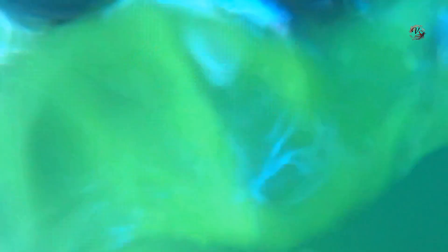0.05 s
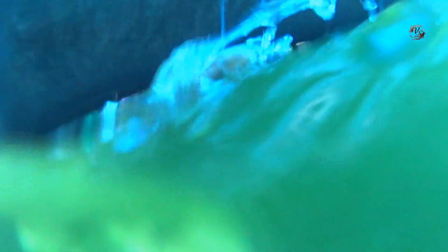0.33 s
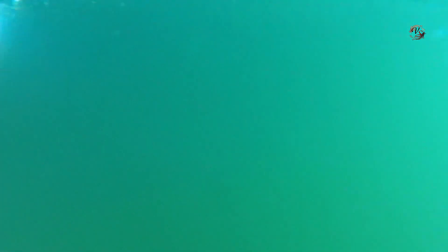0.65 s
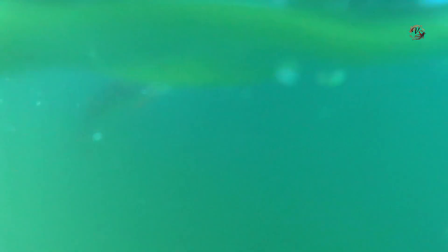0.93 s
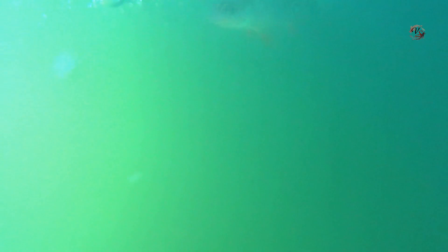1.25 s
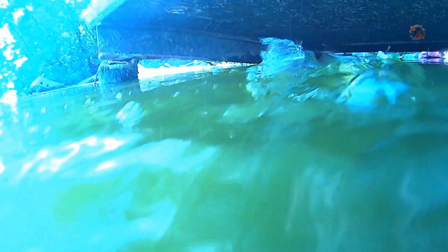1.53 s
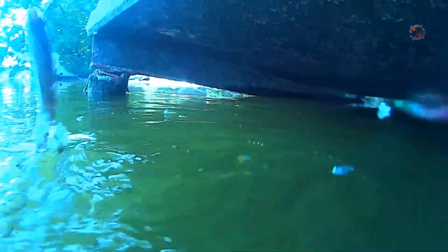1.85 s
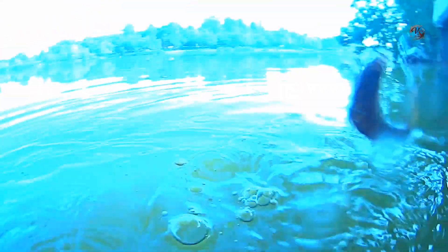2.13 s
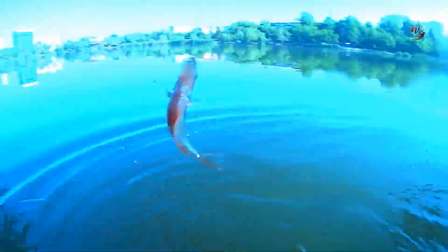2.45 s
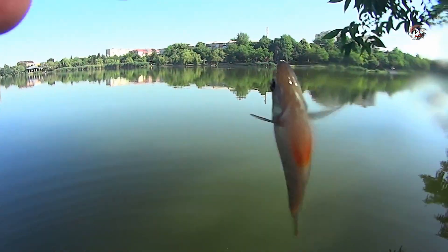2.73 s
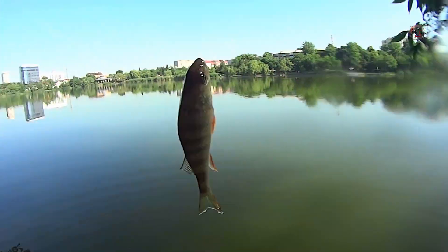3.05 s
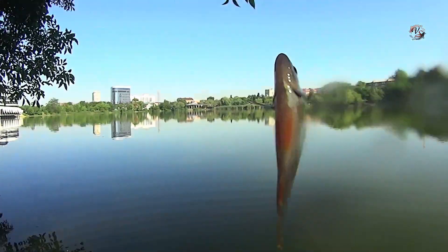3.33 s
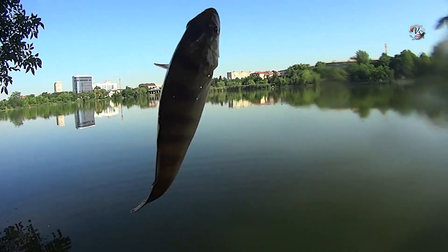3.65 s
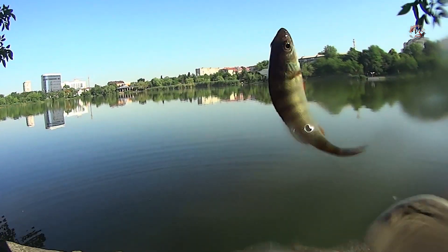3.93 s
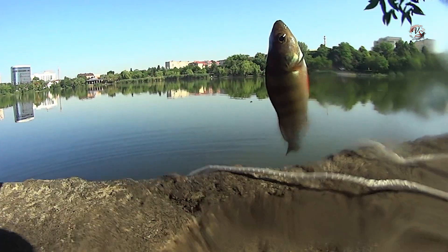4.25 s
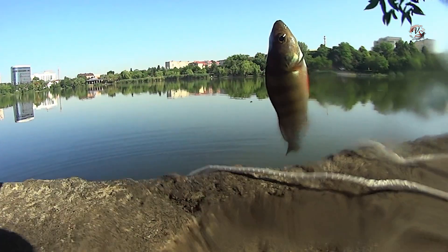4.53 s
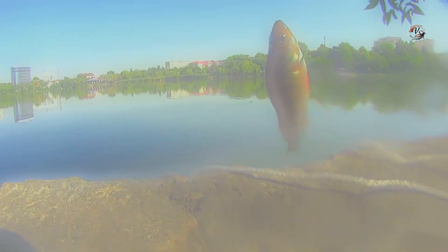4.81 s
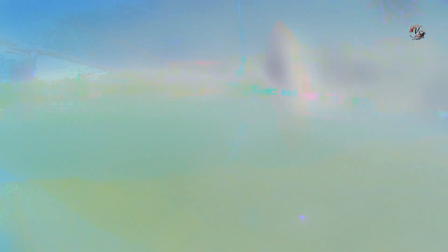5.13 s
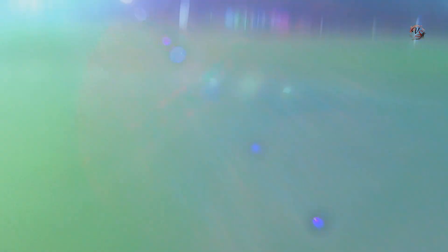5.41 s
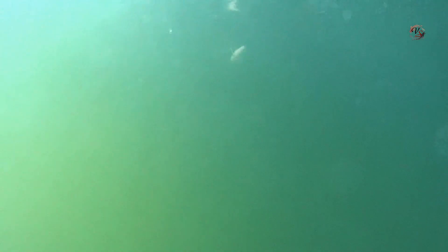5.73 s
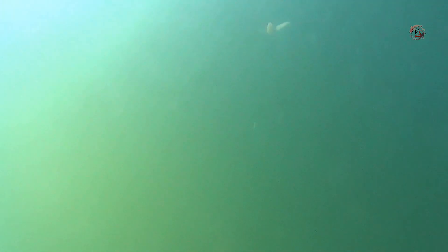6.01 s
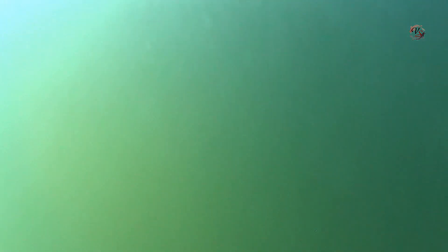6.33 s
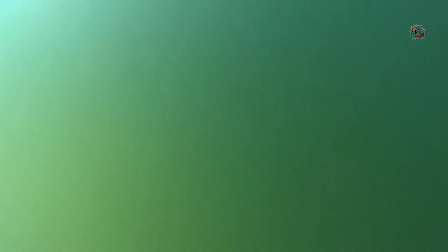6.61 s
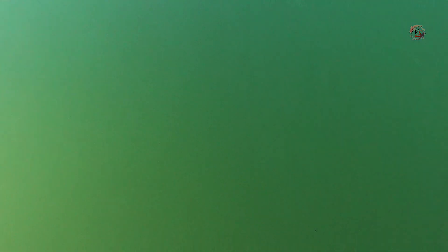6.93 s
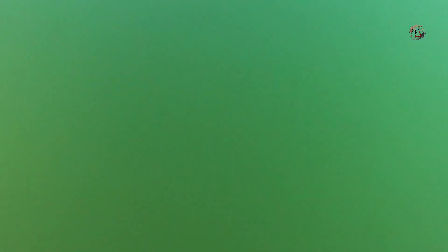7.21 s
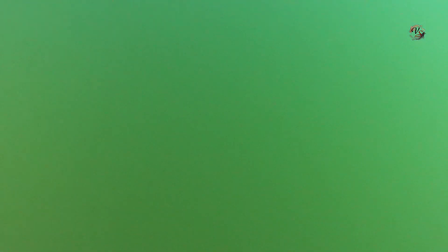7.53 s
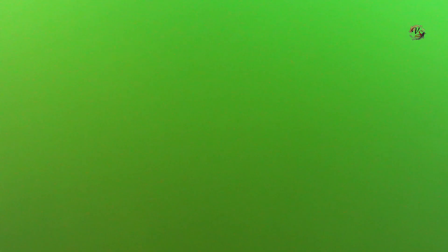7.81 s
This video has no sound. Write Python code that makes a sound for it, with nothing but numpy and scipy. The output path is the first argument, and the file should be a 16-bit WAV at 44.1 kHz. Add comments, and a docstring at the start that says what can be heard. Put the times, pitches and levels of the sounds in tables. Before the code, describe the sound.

Heard from a microphone inside a plastic case at a lake's surface, dense sloshing, rattling knocks and air gulps ring through the shell. Drips tick as it leaves the water, followed by duller rubbing and knocking from fingers. After a sudden short silence, the case goes under with soft bubbling and several sharper gulps, leaving only a low steady hiss.

```python
"""A camera in a plastic housing sloshes at the surface of a lake: water rubs and slaps the shell, which
rings and sways, and air gulps. At 1.7 s it is lifted out; drips tick and the wet shell hums and wavers.
From 3 s fingers shift on it, rubbing, knocking and damping its ring. At 4.2 s the sound cuts out.
From 4.7 s it fades back as the camera sinks with a few gulps of air. After some last faint bubbles
only the microphones' hiss remains."""
import sys
import numpy as np
from scipy import signal
from scipy.fft import rfft, irfft, next_fast_len
from scipy.io import wavfile
from scipy.ndimage import uniform_filter1d, minimum_filter1d, map_coordinates

SR = 44100
rng = np.random.default_rng(int(sys.argv[2]) if len(sys.argv) > 2 else 0)


def master(y):
    """Save y as 16-bit WAV."""
    cut = np.clip(np.atleast_2d(y).T, -1, 1)
    pcm = np.round(cut * 32767)  # scale
    wavfile.write(sys.argv[1], SR, pcm.astype(np.int16))


N = 355887
TIME_S = np.arange(N) / SR
TAIL_S = TIME_S[:SR // 4]

# Shell modes. Each row: pitch in Hz, t60 in seconds, levels awash, wet in air and gripped in dB,
# left minus right in dB, right port's lag in radians.
SHELL_MODES = [(184.7, 0.21, 10.5, 8.5, -17, -2.5, 2), (294, 0.075, 0.5, -0.5, 8, -6.5, 1.56),
               (502, 0.11, 2, 11, 8.5, 4.5, 2.5), (690, 0.027, -8, -2.5, 4, 0, 1.5),
               (896, 0.029, -17.5, -19.5, 2, -2.5, 0.56), (1092.5, 0.2, 11, 3, -50, -0.5, 0.96),
               (1180, 0.017, -4.5, -8.5, -38, 5.5, 0.25), (1474, 0.031, -1.5, -16.5, 3, 0, 0.5),
               (1700, 0.018, -2.5, -3, -6, -0.5, 1.42), (1693, 0.086, -10, 0.5, -29, 1, -0.9),
               (1827, 0.029, -16.5, 2.5, 5, -0.5, -0.45), (2631, 0.022, -2.5, 1, -6, 0, 1.5),
               (3255, 0.0084, -6.5, -4, 3.5, -1.5, 1.5), (3720, 0.016, -9.5, -2.5, -3.5, 2, -1.5),
               (4400, 0.018, -18, -7, -2.5, 0, 2.5), (4915, 0.013, -4, -3.5, -9.5, -1.5, 0.9),
               (5175, 0.0089, -16, -14, -6, -5.5, 0.5), (5734, 0.0071, -8, -15.5, -21.5, -2, 1.47),
               (6757, 0.0054, -16, -14, -34, -2.5, 1), (8300, 0.0074, -21, -11.5, -36, 2.5, 1.5)]
# Load on the shell. Each row: time in seconds, shares awash, wet in air, gripped and deep under.
LOAD_SHARES = [(0, 1, 0, 0, 0), (1.6, 1, 0, 0, 0), (1.76, 0, 1, 0, 0), (2.95, 0, 1, 0, 0),
               (3.09, 0, .7, .3, 0), (3.16, 0, .15, .85, 0), (3.45, 0, 0, 1, 0), (4.2, 0, 0, 1, 0),
               (4.7, 1, 0, 0, 0), (5.55, 1, 0, 0, 0), (5.68, 0, 0, 0, 1)]
WET, GRIPPED, DEEP = 1, 2, 3
# One value per load, in that order: grit gain in dB, grit band's top in Hz, sway gain in dB.
GRIT_GAIN_DB = [-8, -4.5, -5.5, -7]
GRIT_EDGE_HZ = [7600, 8600, 6400, 8870]
SWAY_GAIN_DB = [-5.5, -11, -11.5, -11.5]
# Running contact of water or hand. Each row: time in seconds, push in dB, rub in dB.
SURFACE_WASH = [(0, -51.5, -44), (.06, -50, -62.5), (.16, -34.5, -45), (.43, -44, -46), (.56, -39.5, -41.5),
                (.68, -43, -50.5), (1.0, -56, -56), (1.2, -41.5, -47), (1.62, -39.5, -45),
                (1.73, -56.5, -47.5), (1.76, -48, -40.5), (1.87, -34.5, -37), (2.03, -36, -49),
                (2.17, -34.5, -41), (2.42, -33.5, -47.5), (2.72, -50.5, -55.5), (2.86, -59, -62.5)]
HAND_CONTACT = [(2.9, -46, -35), (2.98, -48.5, -42.5), (3.2, -41.5, -38), (3.34, -50, -42),
                (3.53, -49.5, -56), (3.9, -53, -52.5), (4.16, -53, -55.5)]
SINKING_WASH = [(4.95, -74.5, -67), (5.299, -79.5, -80.5), (5.55, -67.5, -62.5), (5.86, -53.5, -58),
                (6.08, -64.5, -58), (6.249, -82.5, -87.5), (6.6, -80, -87.5)]
# Surges and finger strokes. Each row: centre and half length in seconds, push, rub and grit in dB.
CONTACT_STROKES = [(0.1, .011, -28.5, -21.5, -23), (0.216, 0.029, -28.5, -33.5, -29.5),
                   (0.304, 0.0056, -25.5, -25, -41), (0.403, 0.014, -33, -32.5, -34.5),
                   (0.454, 0.017, -39, -57, -29.5), (0.484, 0.01, -34.5, -34.5, -38),
                   (0.648, 0.0087, -30, -36.5, -44), (0.706, 0.014, -29.5, -35, -39.5),
                   (0.838, 0.01, -36.5, -51, -55), (0.912, 0.012, -42.5, -45, -47),
                   (1.045, 0.0067, -34, -37.5, -33.5), (1.239, 0.016, -29, -26, -23.5),
                   (1.266, 0.01, -50, -34, -26), (1.382, 0.019, -35.5, -39.5, -39),
                   (1.458, 0.014, -41, -31, -30), (1.517, 0.02, -65, -36.5, -29),
                   (1.594, 0.022, -37.5, -30, -27), (1.764, 0.017, -25.5, -32, -35.5),
                   (1.819, 0.016, -24.5, -29, -34), (1.876, .012, -49, -41, -28.5),
                   (1.931, 0.017, -30.5, -37.5, -41), (1.983, 0.0065, -32, -32, -32.5),
                   (2.225, 0.021, -43, -32, -35), (2.35, 0.016, -27, -26.5, -29),
                   (2.458, 0.013, -34, -29, -25.5), (2.493, 0.011, -31, -31, -37),
                   (2.601, 0.017, -30.5, -23.5, -21), (2.644, 0.015, -53, -30, -38),
                   (2.927, 0.019, -37.5, -37, -36.5), (3.083, 0.013, -34.5, -29.5, -26),
                   (3.182, 0.018, -47, -29.5, -28.5), (3.239, 0.021, -38, -31.5, -29.5),
                   (3.287, 0.014, -34.5, -25, -26.5), (3.463, 0.013, -30, -31, -35),
                   (3.585, 0.014, -35, -37.5, -45), (3.628, 0.019, -31, -33.5, -34.5),
                   (3.762, 0.018, -35, -39, -42.5), (3.964, 0.018, -36.5, -40, -46),
                   (4.02, 0.015, -32, -40, -48), (4.099, 0.014, -46, -45.5, -49),
                   (5.833, 0.0081, -30.5, -25.5, -31.5), (6.046, 0.019, -44.5, -59, -64),
                   (6.728, 0.0029, -62.5, -41, -65.5)]
# Noise spectra. Each row: frequency in Hz, relative density in dB.
SWAY_SPECTRUM = [(15, -11.5), (25, -8.5), (36, -1), (52, -11.5), (75, -14.5), (110, -14), (160, -22.5),
                 (300, -46)]
HISS_SPECTRUM = [(53, -24), (90, -2.5), (339, -2.5), (550, -4), (758, -3.5), (1760, -7), (4730, -10.5),
                 (5440, -10), (6020, -10.5), (11000, -13), (14300, -38), (22000, -120)]
# Slow drift deep under. Each row: time in seconds, rumble level in dB.
DEEP_DRIFT = [(6.2, -75), (6.694, -59.5), (6.752, -53), (6.896, -67.5), (7.47, -77), (7.528, -63.5),
              (8.07, -78)]
# Knocks and slaps. Each row: start in seconds, ring level in dB, pitch in Hz, t60 in seconds,
# thud in dB, click in dB.
KNOCK_HITS = [(0.0937, -4, 990, 0.0042, -47, -17), (0.097, -7.5, 868, 0.044, -44, -60),
              (0.2092, -5.5, 1540, 0.014, -17.5, -49), (0.2338, -18, 2550, 0.041, -24, -10),
              (0.284, -18, 1820, 0.01, -27.5, -42), (0.35, -20.5, 815, 0.02, -27, -44),
              (.361, -14.5, 1320, 0.011, -44, -52), (.37, -18, 705, 0.016, -25, -35),
              (0.4092, -4, 1140, 0.017, -22, -49), (0.4446, -5, 1680, 0.0066, -37, -33),
              (0.4987, -14, 1546, 0.03, -55, -21), (0.6038, -22.5, 1480, 0.033, -28, -30.5),
              (.607, -16, 1104, 0.015, -48, -38), (0.691, -19, 1110, 0.018, -36, -36),
              (0.7192, -4.5, 1406, 0.025, -30, -25.5), (0.7273, -18, 1290, 0.028, -19.5, -15.5),
              (.735, -24, 1590, 0.026, -32, -40), (0.8242, -25.5, 1120, 0.016, -34, -61),
              (0.965, -35, 1560, 0.04, -38, -53), (1.0363, -38, 1080, 0.014, -32, -48),
              (1.076, -30.5, 1130, .012, -44, -40), (1.2398, -18.5, 1700, 0.052, -54, -23),
              (1.36, -24, 1040, 0.029, -36, -41), (1.3932, -26.5, 1060, 0.028, -34, -32.5),
              (1.506, -31, 2650, 0.07, -48, -38), (1.6473, -28, 1733, 0.065, -29, -50),
              (1.701, -23, 1820, 0.012, -45, -44.5), (1.452, -19.5, 1667, 0.072, -27, -34),
              (1.693, -17, 850, 0.012, -42, -40), (1.7645, -12, 1770, 0.052, -28.5, -29),
              (1.792, -12, 1790, 0.027, -35, -27), (1.8063, 0, 1314, 0.011, -37, -46),
              (1.876, -16, 1764, 0.053, -43, -38), (1.909, -18.5, 1760, 0.066, -33, -28),
              (2.095, -11.5, 1715, 0.024, -45, -17), (2.1, -2.5, 1750, 0.0061, -36, -17.5),
              (2.1325, -18.5, 1766, 0.052, -29, -13.5), (2.3, -20.5, 686, 0.052, -23, -51),
              (2.3443, -17.5, 1780, 0.039, -25, -32), (2.524, -21.5, 1770, 0.058, -43, -37),
              (2.6257, -15.5, 1660, 0.049, -41, -9.5), (2.685, -14.5, 1900, 0.009, -59, -24.5),
              (2.8857, -25.5, 1760, 0.04, -29.5, -35), (2.93, -22.5, 1770, 0.045, -44, -28),
              (2.9997, -11.5, 1620, 0.0081, -22, -46), (3.1325, -9, 1490, 0.017, -26.5, -32),
              (3.338, -13, 1880, 0.019, -28, -40), (3.371, -25, 1880, 0.063, -25, -34),
              (3.565, -24.5, 300, 0.039, -36, -45), (3.622, -22, 299, 0.12, -48, -52),
              (3.629, -19.5, 1390, 0.05, -32, -45), (3.754, -27, 304, 0.13, -38, -52),
              (3.834, -30.5, 1980, 0.019, -42, -59), (3.959, -24, 310, 0.11, -49, -54),
              (4.017, -25.5, 310, 0.14, -41, -58), (4.959, -42, 1745, 0.043, -68, -47),
              (5.282, -44, 1414, 0.034, -67, -42), (5.488, -36, 1490, 0.013, -56, -41),
              (5.619, -38, 1324, 0.012, -66, -37), (5.663, -24.5, 1275, 0.02, -57, -65),
              (5.713, -26, 838, 0.073, -25, -70), (5.7659, -6, 1404, 0.015, -50, -29),
              (5.7759, 0.5, 1470, 0.0088, -53, -48), (5.8159, -12.5, 1185, 0.045, -21, -52),
              (5.89, -26.5, 1390, 0.011, -35.5, -52), (5.994, -8.5, 793, 0.038, -17.5, -40),
              (6.0479, -23.5, 1378, 0.026, -27.5, -40.5), (6.7376, -12, 739, 0.026, -60, -44),
              (6.809, -29.5, 1520, 0.014, -49, -62)]
# A knock's side rings. Each row: pitch ratio, relative level in dB, t60 ratio.
KNOCK_PARTIALS = [(0.602, -14, 1), (1.552, -19, 0.97)]
# Droplets and specks on the shell. Each row: start in seconds, click in dB.
DROPLET_TICKS = [(1.2238, -32), (1.8534, -26.5), (2.444, -30), (2.4597, -21), (2.591, -24), (5.734, -44),
                 (5.741, -44), (5.762, -33), (6.7402, -40.5), (6.754, -44)]
# Gulps of air, hums of the wet shell and low thumps. Each row: start in seconds, level in dB,
# pitch in Hz, t60 and swell in seconds, fractional pitch rise per t60.
GLIDING_RINGS = [(0.147, -23, 95, 0.11, 0.0047, 0.95), (0.186, -16.5, 74.5, 0.066, 0.0033, -0.025),
                 (0.191, -20.5, 288, 0.09, 0.0026, -0.57), (0.305, -22.5, 493, 0.17, 0.004, -0.12),
                 (0.3157, 1, 3247, 0.013, 0.00097, -0.07), (0.406, -22.5, 149, .15, 0.0038, -0.39),
                 (0.481, -9.5, 690, 0.024, 0.0035, -0.064), (.501, -24, 3220, 0.052, .004, -0.24),
                 (0.61, -25, 189, 0.16, 0.01, 0.99), (0.686, -20, 201, 0.082, 0.0046, -0.21),
                 (.7195, -13, 868, 0.051, 0.00072, -0.016), (1.769, -11, 497.7, 0.12, 0.012, -0.041),
                 (1.769, -22.5, 183.5, 0.27, 0.0076, 0.091), (1.819, -27, 252, 0.17, .005, -0.76),
                 (1.822, -25, 476, 0.2, 0.0091, 0.043), (1.854, -6.5, 1786, 0.047, 0.0015, -0.068),
                 (1.941, -16, 280, 0.049, 0.0056, 0.9), (1.959, -23, 443, 0.069, 0.004, -0.28),
                 (2.022, -10, 495, 0.12, 0.032, 0.16), (2.092, -23, 507, 0.16, 0.0087, 0.21),
                 (2.118, -15.5, 517, 0.13, 0.013, -0.21), (2.197, -20.5, 199, .07, 0.0036, -0.34),
                 (2.197, -11.5, 511, 0.071, 0.012, -0.032), (2.35, -15.5, 518, 0.12, 0.021, -0.2),
                 (2.432, -18.5, 136, 0.037, .002, 0.56), (2.4582, -4.5, 1794, 0.039, 0.0016, 0.2),
                 (2.47, -18, 528, 0.13, 0.025, -0.24), (2.502, -19.5, 175, 0.11, 0.0018, -0.054),
                 (2.629, -15, 1180, 0.036, 0.0012, -0.28), (2.998, -17, 131, 0.026, 0.0011, 0.24),
                 (5.7657, 5, 2810, 0.0036, 0.00084, -0.27), (5.7766, -12, 2250, 0.0091, 0.00032, -0.26),
                 (5.8252, -0.5, 1225, 0.024, 0.002, 0.24), (5.996, -24, 243, 0.083, 0.0039, 0.12),
                 (6, -16, 1250, 0.034, 0.00029, 0.11), (6.048, -30, 170, 0.09, 0.0043, 0.33),
                 (6.607, -49, 5250, 0.031, 0.0015, 0), (6.74, -28.5, 1946, 0.027, 0.0014, 0.28),
                 (6.7376, -1, 1415, 0.041, 0.0026, 0.12)]
# Small bubbles. Each row: start and end in seconds, bubbles per second, lowest and highest pitch in Hz,
# level before scatter in dB.
BUBBLE_CLOUDS = [(0.442, 0.519, 510, 2580, 3300, -36.5), (1.738, 2.652, 115, 1648, 1962, -37),
                 (2.884, 2.953, 320, 1750, 1920, -28), (4.762, 5.092, 88, 1658, 1775, -52),
                 (5.124, 5.604, 58, 1394, 1525, -59.5), (6.747, 6.819, 190, 1350, 1650, -49),
                 (6.528, 6.707, 60, 5030, 5630, -52.5), (6.827, 6.895, 200, 5280, 5670, -59),
                 (7.43, 7.58, 110, 5300, 5590, -60.5)]
# Hard onsets of knocks and slaps. Each row: start in seconds, level in dB, pitch in Hz.
SHARP_CRACKS = [(0.349, -9, 1480), (0.4446, -7, 1700), (0.5001, -6, 4100), (1.507, -15, 6000),
                (1.8062, -11.5, 1700), (5.7675, -22, 4400), (5.9942, -13, 2900), (6.739, -26, 1920)]
# Two brief dips, a mute and a fade-in. Each row: time in seconds, gain.
FADER_GAIN = [(0, 1), (.2118, 1), (.2121, .1), (.2243, .1), (.226, 1), (2.6115, 1), (2.612, .15),
              (2.622, .15), (2.624, 1), (4.17, 1), (4.174, 0), (4.72, 0), (4.8, .22), (5.0, .42), (5.5, 1)]


def undb(db):
    """Decibels to gain."""
    return 10 ** (np.asarray(db) / 20)


def curves(table):
    """Each column of a timed table, sample by sample."""
    times_s, *columns = np.transpose(table)
    return np.array([np.interp(TIME_S, times_s, column) for column in columns])


def unit(x):
    """Scale to rms 1."""
    return x / np.sqrt(np.mean(x ** 2))


def unit_energy(x):
    """Scale to energy 1 per channel, on average."""
    return unit(x) / np.sqrt(x.shape[-1])


def add(track, start_s, sound):
    """Mix a sound into a track."""
    i = max(0, int(start_s * SR))
    n = min(sound.shape[-1], N - i)
    track[..., i:i + n] += sound[..., :n]


def walk(rate_hz):
    """Smooth random wander, rms 1."""
    hold = max(2, int(SR / rate_hz))
    steps = np.repeat(rng.standard_normal(N // hold + 1), hold)
    return unit(uniform_filter1d(steps, hold)[:N])


def noise(spectrum):
    """Shaped noise, rms 1."""
    hz, db = np.transpose(spectrum)
    size = next_fast_len(N)
    bins_hz = np.maximum(np.fft.rfftfreq(size, 1 / SR), 1)
    gain = undb(np.interp(np.log(bins_hz), np.log(hz), db))
    return unit(irfft(rfft(rng.standard_normal(size)) * gain, size)[:N])


def grains(rate_hz, spread_db):
    """Tiny random impacts, a few of them strong; rms 1."""
    size = undb(spread_db * np.minimum(rng.standard_normal(N), 2.5))
    return unit((rng.random(N) < rate_hz / SR) * size * rng.choice([-1, 1], N))


def ring(hz, t60_s, swell_s, lag_rad, rise=0, samples=None):
    """Damped oscillation that builds up and may glide; the right port lags."""
    t = TAIL_S[:samples]
    phase = 2 * np.pi * hz * (t + rise * np.minimum(t, 2 * t60_s) ** 2 / (2 * t60_s))
    envelope = (1 - np.exp(-t / max(swell_s, 1e-5))) * np.exp(-np.log(1000) * t / t60_s)
    return envelope * np.sin(phase - np.array([[0], [lag_rad]]))


def contact_power(trim_db=(-0.5, -1, 1), surge_db=4.5):
    """Push, rub and grit power: randomly surging contact plus strong strokes."""
    push_db, rub_db = curves(np.vstack([SURFACE_WASH, HAND_CONTACT, SINKING_WASH]))
    running_db = np.array([push_db, rub_db, rub_db]) + np.array(trim_db)[:, None]
    power = undb(running_db + surge_db * walk(rate_hz=20)) ** 2
    for centre_s, half_s, *levels_db in CONTACT_STROKES:
        swell = np.exp(-(TAIL_S / half_s - 3) ** 2)
        add(power, centre_s - 3 * half_s, undb(levels_db)[:, None] ** 2 * swell)
    return power


def rubbing(push, rub, grit, water_flutter_db=2, skin_flutter_db=1.33):
    """Water drags over the case in tiny uneven slips; skin slides in a smooth swish."""
    loads = curves(LOAD_SHARES)
    power = np.array([push, rub, grit * (undb(GRIT_GAIN_DB) @ loads) ** 2])
    coarse = grains(rate_hz=1400, spread_db=5)
    fine = grains(rate_hz=3800, spread_db=3)
    crackle = grains(rate_hz=380, spread_db=3.5)
    slips = np.array([unit(coarse + 1.6 * fine),
                      unit(coarse + 0.8 * fine + 0.38 * crackle),
                      unit(fine + 0.54 * crackle)])
    water = slips * unit(undb(water_flutter_db * walk(rate_hz=95)))
    skin = rng.standard_normal((3, N)) * unit(undb(skin_flutter_db * walk(rate_hz=84)))
    grip = np.minimum(1, 3 * loads[GRIPPED])
    return np.sqrt(power) * (np.sqrt(1 - grip) * water + np.sqrt(grip) * skin)


def shell_response(load, crack_db=-25, crack_s=0.0001, spot_db=5, spot_lag_rad=0.63):
    """A tap on one spot, at both ports: the loaded shell's modes and a brief crack."""
    modes = 0
    for hz, t60_s, awash_db, wet_db, grip_db, pan_db, lag_rad in SHELL_MODES:
        db = [awash_db, wet_db, grip_db, awash_db][load]
        decay_s = t60_s * [1, 1, 0.49, 0.16][load]  # fingers and deep water damp the ring
        chance = rng.standard_normal(4)
        ports = undb(db + np.array([[pan_db], [-pan_db]]) / 2 + spot_db * chance[:2, None])
        # short waves vary most from spot to spot, in lag and pitch
        lag_rad += spot_lag_rad * min(1, hz / 600) * chance[2]
        detune = (0.0021 + 0.035 * (hz / 8000) ** 1.5) * chance[3]
        modes += ports * ring(hz * (1 + detune), decay_s, 0.14 / hz, lag_rad) / decay_s
    crack = rng.standard_normal((2, len(TAIL_S))) * np.exp(-TAIL_S / crack_s)
    return unit(modes) + undb(crack_db) * unit(crack)


def shell(forces, spots=4, hop_s=0.012):
    """Push, rub and grit each drive a band of modes; the contact hops between spots."""
    hold = int(hop_s * SR)
    touched = np.repeat(rng.integers(spots, size=N // hold + 1), hold)[:N]
    out = np.zeros((2, N))
    for load, share in enumerate(curves(LOAD_SHARES)):
        first, last = np.flatnonzero(share)[[0, -1]]
        bands_hz = [(115, 750), (650, 2500), (2300, GRIT_EDGE_HZ[load])]
        for spot in range(spots):
            response = shell_response(load)
            for force, edges_hz in zip(forces * np.sqrt(share) * (touched == spot), bands_hz):
                bandpass = signal.butter(3, edges_hz, "band", fs=SR, output="sos")
                band = unit_energy(signal.sosfilt(bandpass, response))
                add(out, first / SR, signal.oaconvolve(force[None, first:last], band, axes=1))
    return out


def sway(push_power, decay_s=0.019, side_db=-17):
    """Pushes and deep drift sway the whole camera: a rumble almost alike in both ports."""
    loads = curves(LOAD_SHARES)
    pole = np.exp(-1 / (decay_s * SR))
    power = signal.lfilter([1 - pole], [1, -pole], push_power) * (undb(SWAY_GAIN_DB) @ loads) ** 2
    drift = undb(curves(DEEP_DRIFT)[0]) * loads[DEEP]
    rumble = noise(SWAY_SPECTRUM) + undb(side_db) * noise(SWAY_SPECTRUM) * np.array([[1], [-1]])
    return rumble * np.sqrt(power + drift ** 2)


def hiss(level_db=-58.5, shared_gain=0.12):
    """The microphones' own steady noise."""
    separate = np.array([noise(HISS_SPECTRUM), noise(HISS_SPECTRUM)])
    return undb(level_db) * unit(separate + shared_gain * noise(HISS_SPECTRUM))


def knocks(chatter_s=0.0018, snap_s=0.0016, swell_s=0.00085, lag_rad=0.74, body_db=-15, main_db=-1):
    """Knocks shove, chatter, click and ring where they land; ticks only click."""
    forces, rings = np.zeros((3, N)), np.zeros((2, N))
    contact_gain = np.sqrt(0.002 * SR)  # energy of 2 ms at rms 1
    for start_s, ring_db, hz, t60_s, thud_db, _ in KNOCK_HITS:
        chatter = unit_energy(rng.standard_normal(len(TAIL_S)) * TAIL_S * np.exp(-TAIL_S / chatter_s))
        add(forces[0], start_s, np.array([contact_gain * undb(thud_db)]))
        add(forces[1], start_s, contact_gain * undb(ring_db + body_db) * chatter)
        add(rings, start_s, undb(ring_db + main_db) * ring(hz, t60_s, swell_s, lag_rad))
        for pitch_ratio, db, t60_ratio in KNOCK_PARTIALS:
            stray, side = rng.standard_normal(2)
            partial_hz = hz * pitch_ratio * (1 + 0.099 * stray)
            partial = ring(partial_hz, t60_s * t60_ratio, swell_s, lag_rad * side)
            add(rings, start_s, undb(ring_db + db) * partial)
    for start_s, *_, click_db in KNOCK_HITS + DROPLET_TICKS:
        snap = unit_energy(rng.standard_normal(len(TAIL_S)) * np.exp(-TAIL_S / snap_s))
        add(forces[2], start_s, contact_gain * undb(click_db) * snap)
    return forces, rings


def gliding_rings():
    """Swelling, gliding rings: gulps of air, hums of the wet shell and low thumps."""
    out = np.zeros((2, N))
    for start_s, db, hz, t60_s, swell_s, rise in GLIDING_RINGS:
        add(out, start_s, undb(db) * ring(hz, t60_s, swell_s, lag_rad=0.92, rise=rise))
    return out


def sharp_cracks(t60_cycles=2.6):
    """The hard, brief crack at the start of a knock or slap: one swing, hardly any ring."""
    out = np.zeros((2, N))
    for start_s, db, hz in SHARP_CRACKS:
        add(out, start_s, undb(db) * ring(hz, t60_cycles / hz, swell_s=0, lag_rad=0.36))
    return out


def bubble_clouds():
    """Small bubbles ring briefly at random, each rising slightly in pitch."""
    out = np.zeros((2, N))
    for start_s, end_s, rate_hz, low_hz, high_hz, db in BUBBLE_CLOUDS:
        span_s = end_s - start_s
        for when, pitch, size, place in rng.random((200, 4))[:int(rate_hz * span_s)]:
            hz = low_hz * (high_hz / low_hz) ** pitch
            scatter_db = 30.4 * size - 18
            bubble = ring(hz, t60_s=0.027, swell_s=0.0012, lag_rad=2 * place - 1, rise=0.027, samples=2048)
            add(out, start_s + when * span_s, undb(db + scatter_db) * bubble)
    return out


def runoff_waver(sound, depth_s=0.0003):
    """Water running off the wet case changes its load, so the ringing wavers in pitch."""
    delay_s = depth_s * walk(rate_hz=22) * curves(LOAD_SHARES)[WET]
    return np.array([map_coordinates(port, [(TIME_S - delay_s) * SR], mode="nearest") for port in sound])


def scene():
    """All contacts drive one shell; rings, cracks, bubbles, sway and hiss join it."""
    blows, rings = knocks()
    push, rub, grit = contact_power()
    case = runoff_waver(shell(rubbing(push, rub, grit) + blows))
    direct = rings + gliding_rings() + sharp_cracks() + bubble_clouds()
    return case + direct + sway(push + blows[0] ** 2) + hiss()


def record(dry, ceiling_db=-3.5, top_hz=11050):
    """Fast peak limiter, fader, steep low-pass."""
    allowed = np.minimum(1, undb(ceiling_db) / (np.abs(dry).max(axis=0) + 1e-9))
    limiter_gain = uniform_filter1d(minimum_filter1d(allowed, size=130), size=65)
    lowpass = signal.ellip(10, 0.2, 70, top_hz, fs=SR, output="sos")
    return signal.sosfilt(lowpass, dry * limiter_gain * curves(FADER_GAIN)[0])


dry = scene()
out = record(dry)
master(out)
```